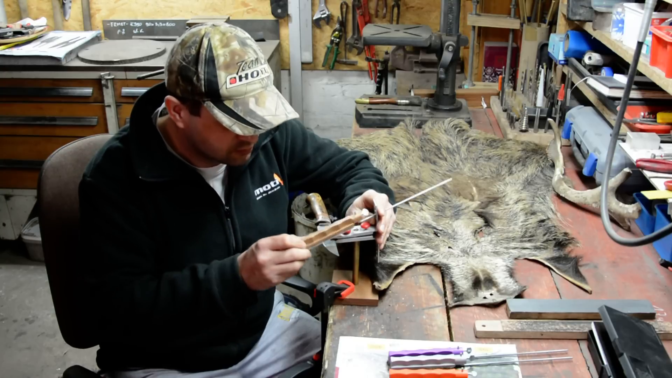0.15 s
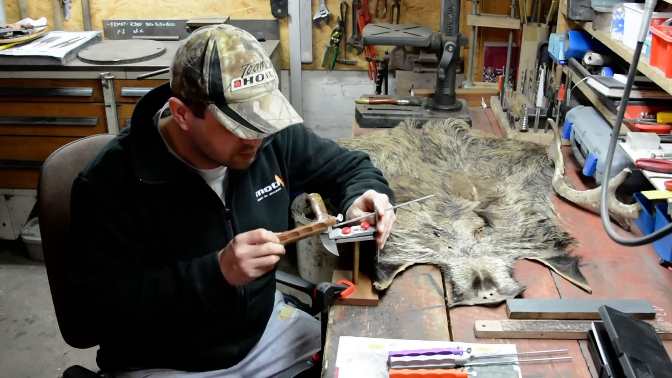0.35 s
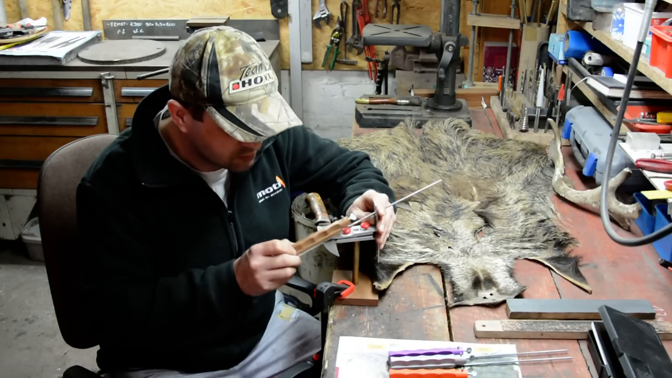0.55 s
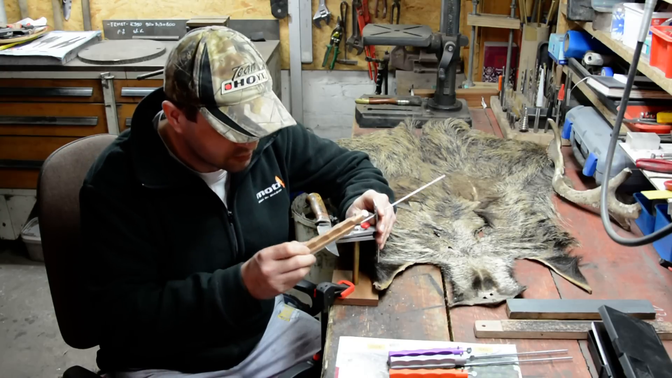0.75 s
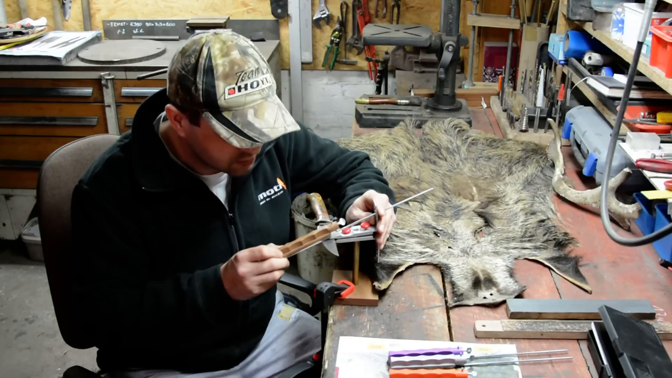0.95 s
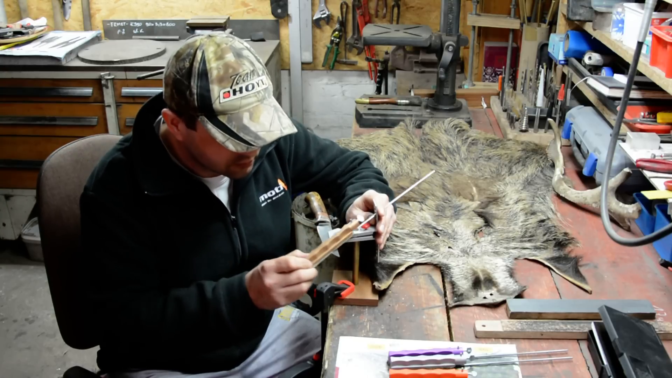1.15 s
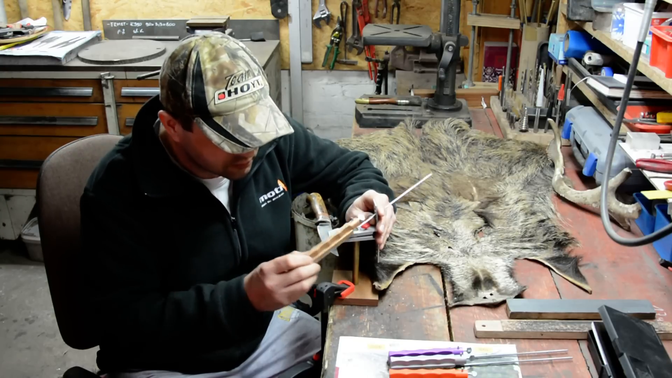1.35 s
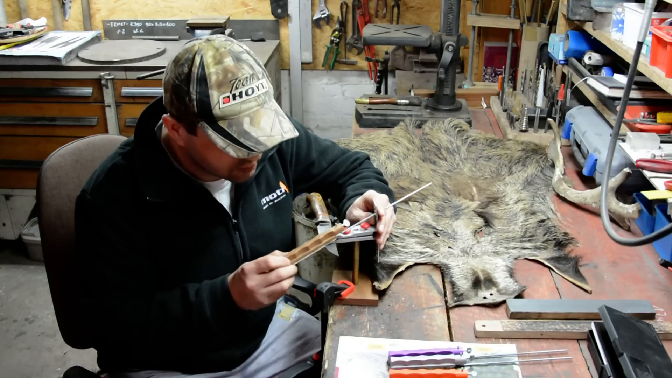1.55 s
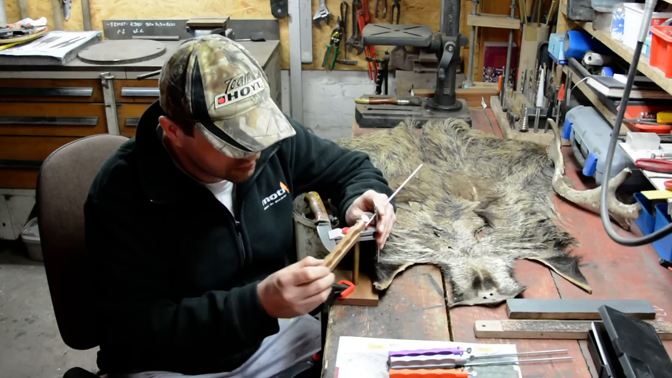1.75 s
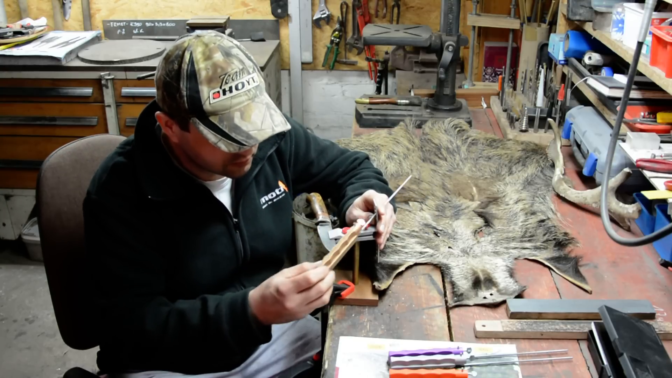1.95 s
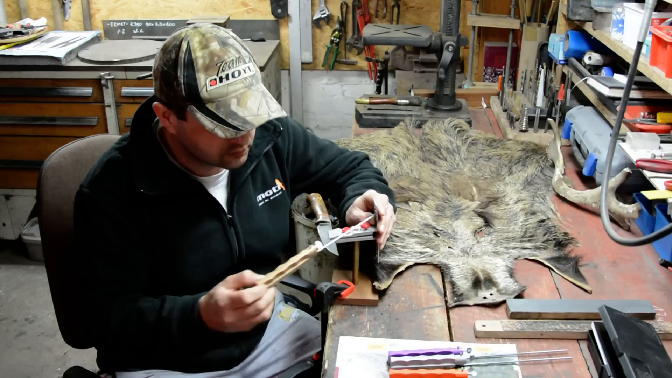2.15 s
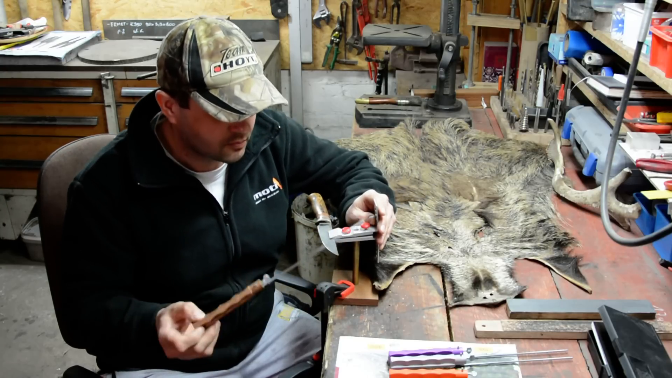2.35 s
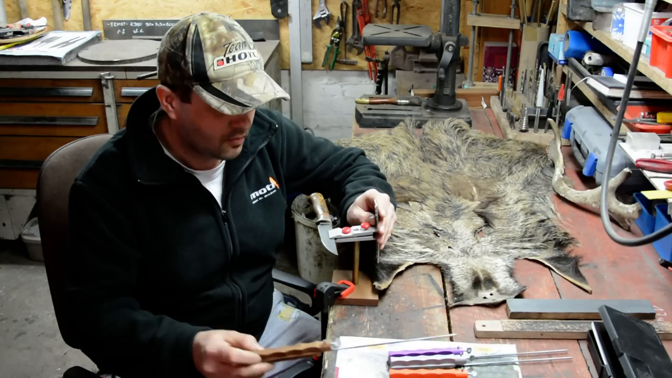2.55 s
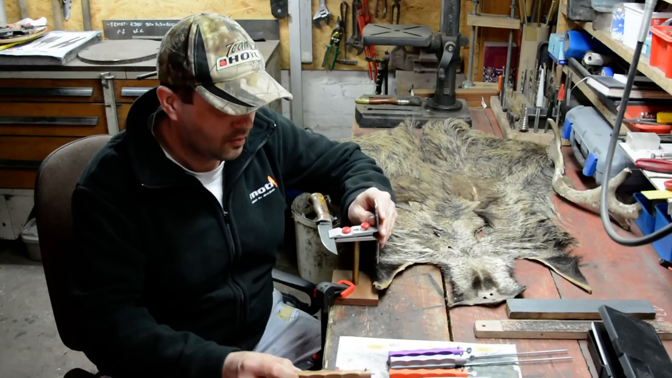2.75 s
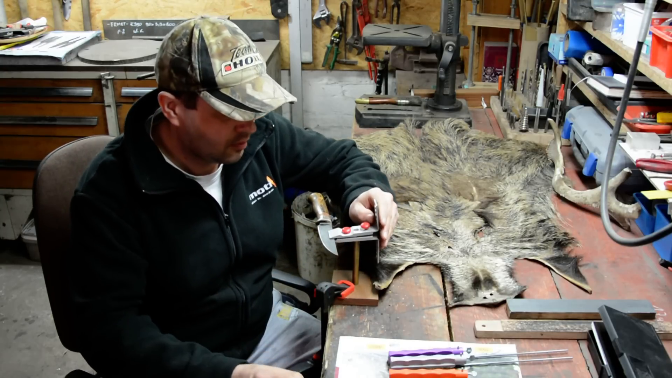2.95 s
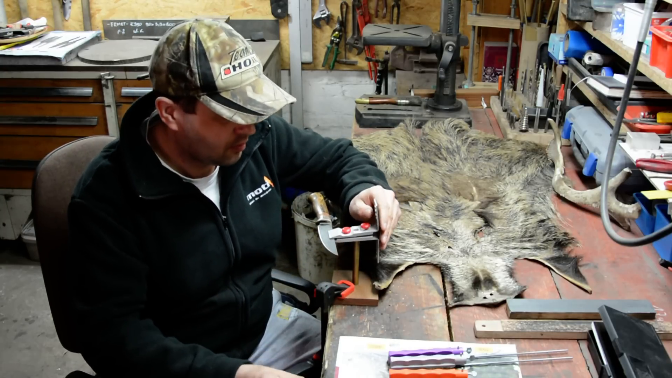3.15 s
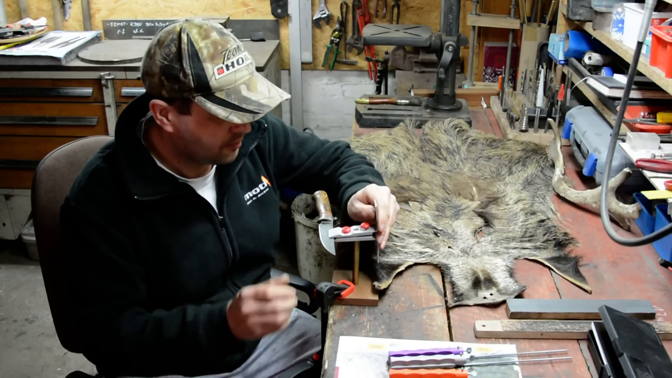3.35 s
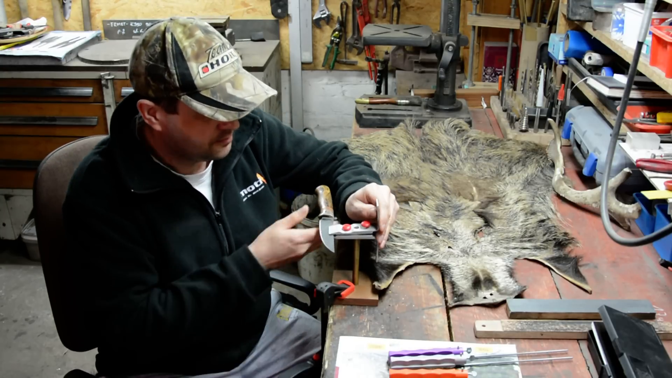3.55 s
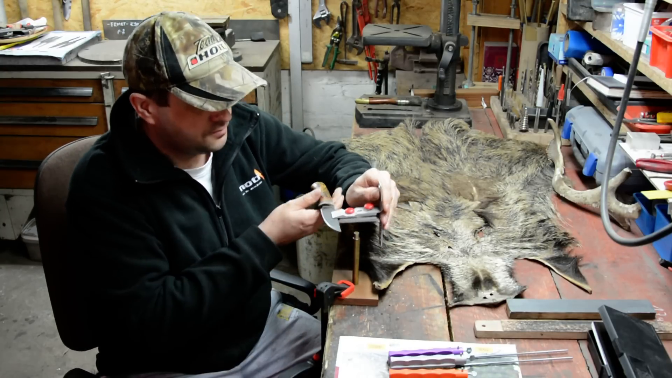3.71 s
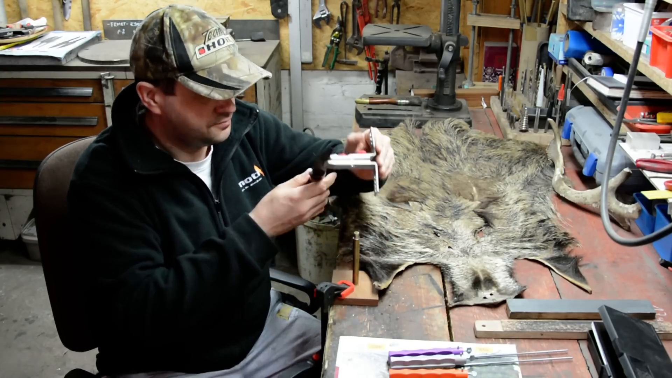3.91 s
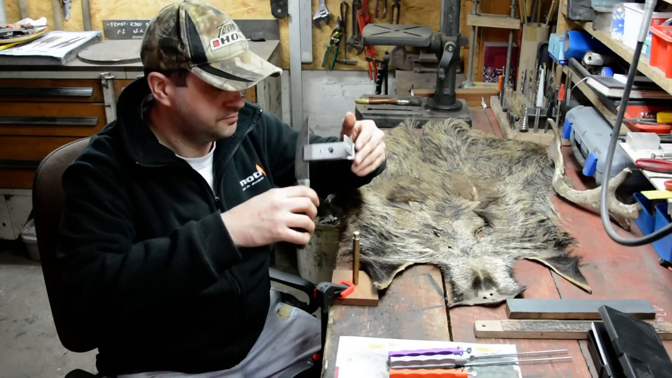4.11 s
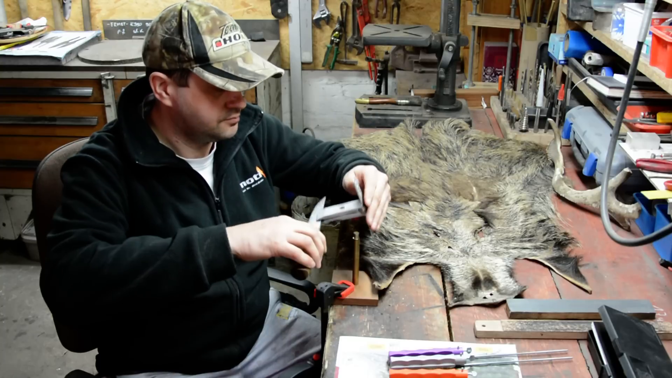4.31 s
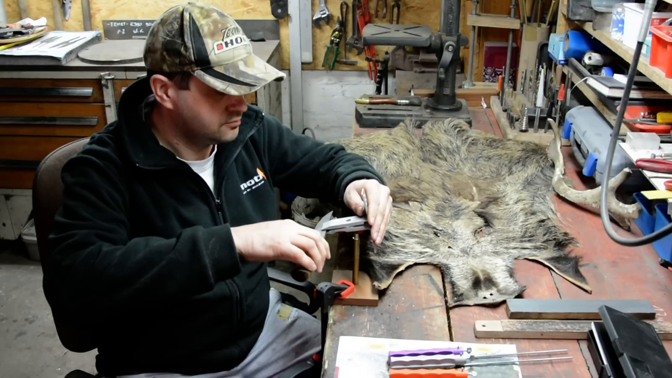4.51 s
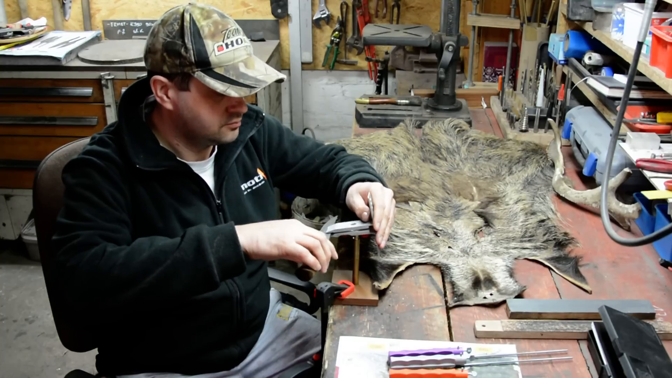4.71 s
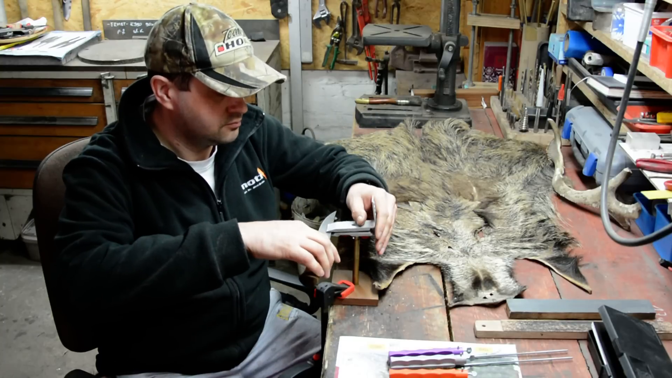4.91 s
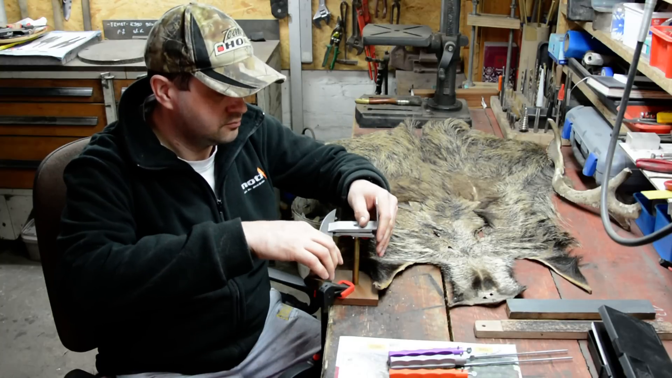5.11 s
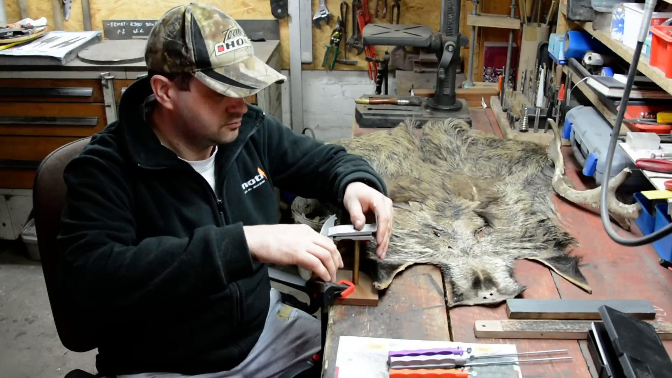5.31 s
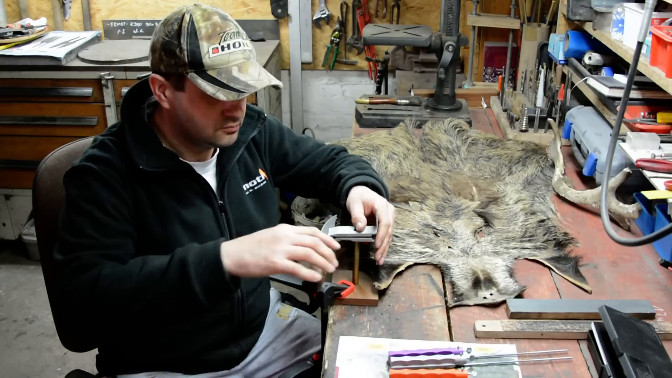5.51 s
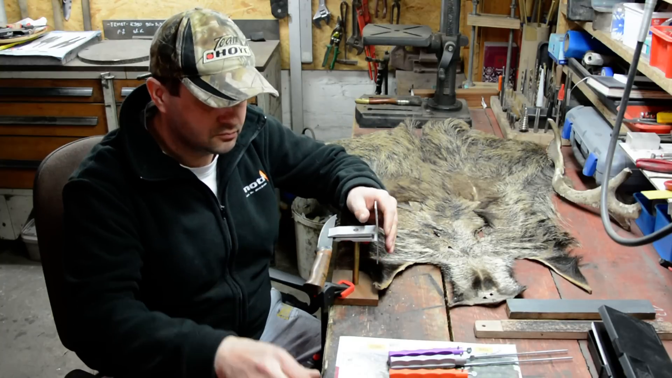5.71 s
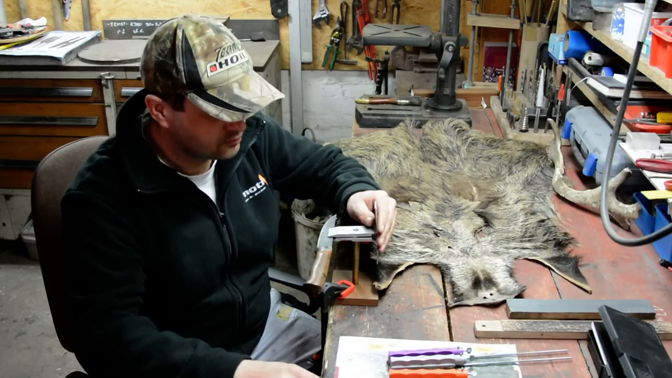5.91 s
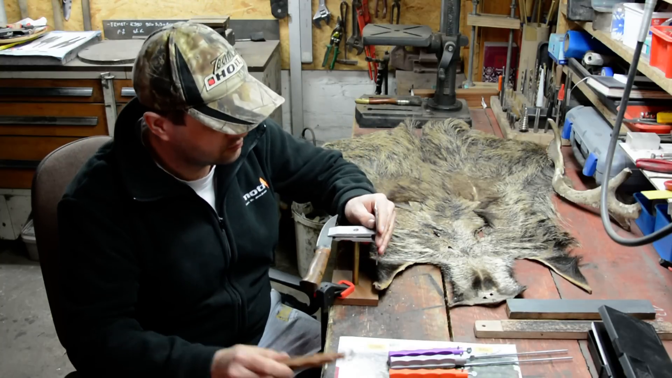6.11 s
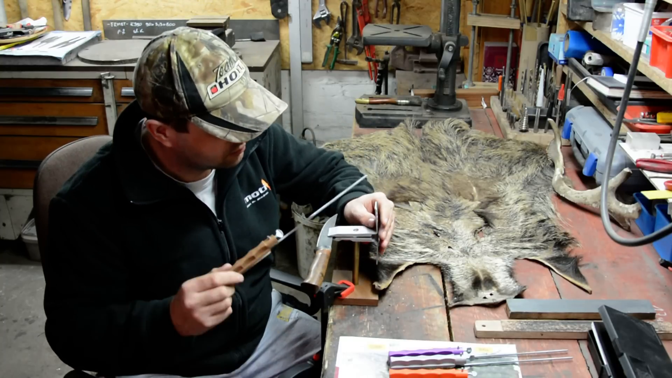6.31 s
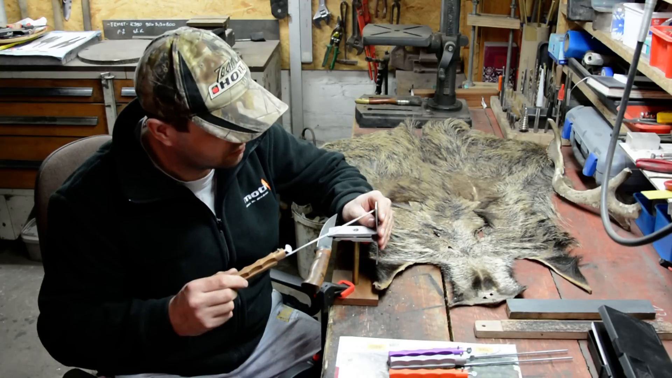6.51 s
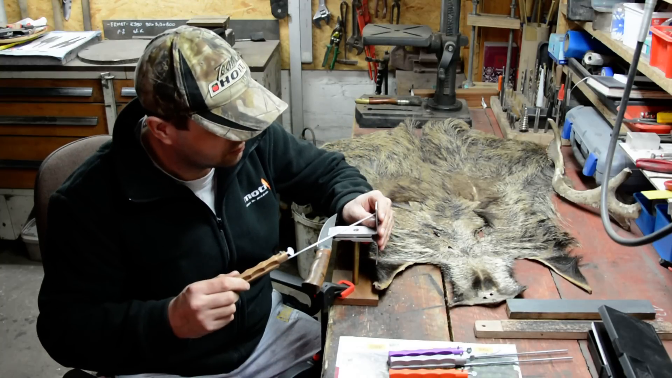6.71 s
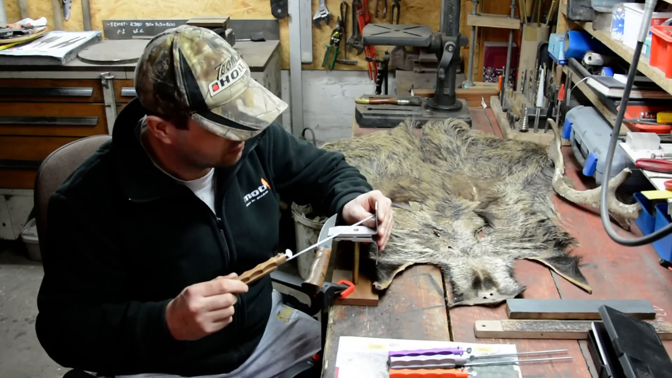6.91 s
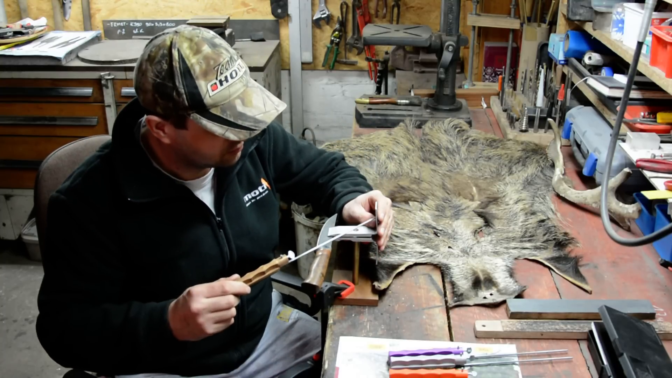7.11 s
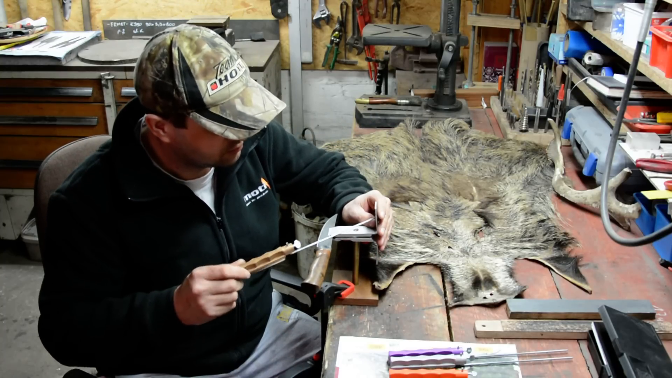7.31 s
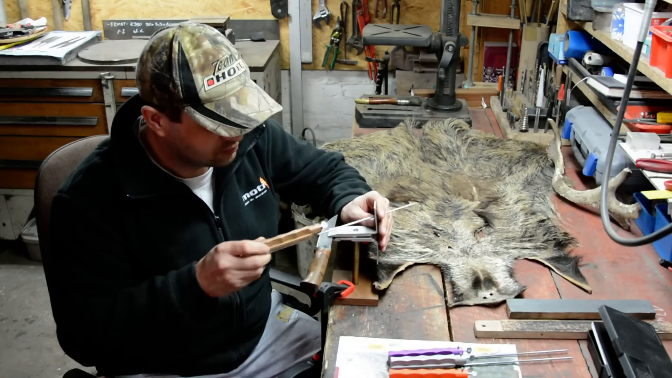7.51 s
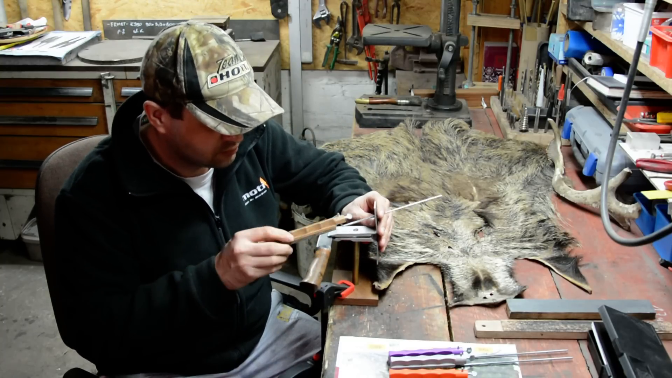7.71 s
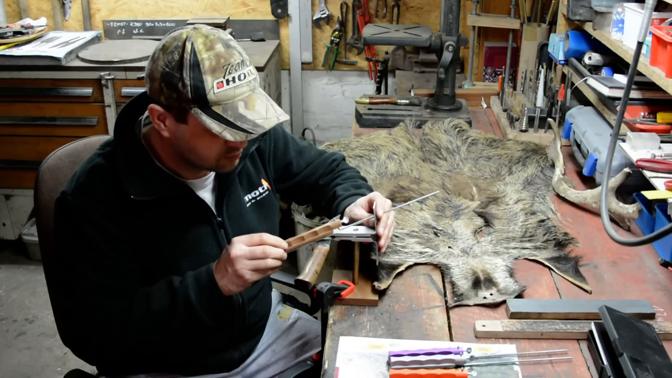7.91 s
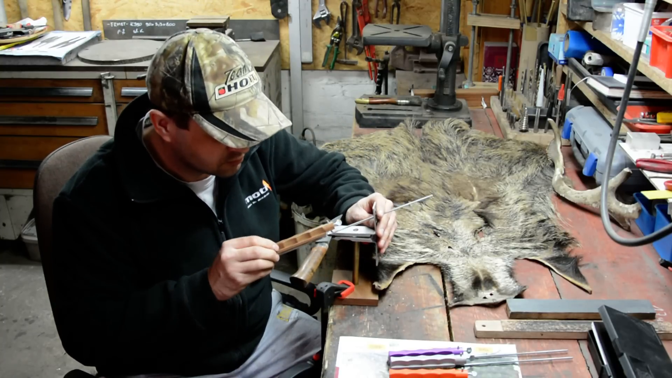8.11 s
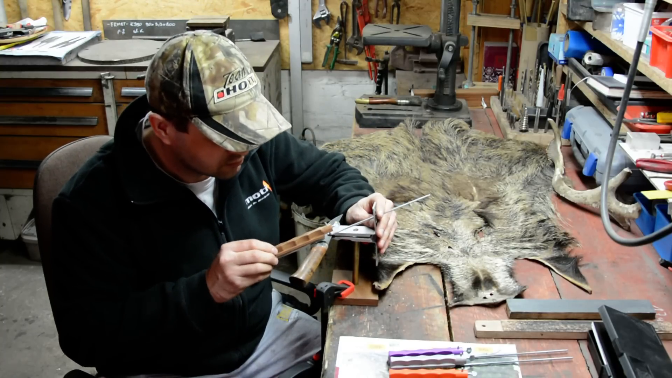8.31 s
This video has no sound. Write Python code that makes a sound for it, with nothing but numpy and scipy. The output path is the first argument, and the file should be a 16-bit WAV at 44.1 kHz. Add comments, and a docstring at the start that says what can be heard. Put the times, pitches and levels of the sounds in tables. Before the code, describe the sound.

Close, dry-ish sound in a small tool room with faint steady air and hum. Eight quick abrasive strokes alternate strong scrapes with duller, lighter returns, tapping the steel. A pause brings soft sleeve brushing, dull bumps and clamp chafing, ending in a very sharp, loud knock. After a quiet gap, metal clicks announce the rod's return, then a short rising squeak and one bright stroke.

```python
"""A sharpening stone on a guide rod is stroked along a clamped knife: grit drives the blade's modes and a hiss.
Taps excite blade modes through short chattering contacts; the rod rings as decaying sines when drawn out.
The stone is laid down and the clamp turned over and knocked home: blows on stand modes, plus friction noise.
A sleeve brushes, the rod clicks back, and the next stroke squeaks with a rising, unsteady tone.
Filtered noise and wavering hum give the air of a small workshop, whose reflections are decaying noise."""
import sys
import numpy as np
from scipy import signal
from scipy.fft import rfft, irfft
from scipy.io import wavfile
from scipy.ndimage import map_coordinates

SR = 44100
rng = np.random.default_rng(int(sys.argv[2]) if len(sys.argv) > 2 else 0)


def wrap_up_sound(samples):
    """Save the sound to the file named by the first command line argument, as 16-bit audio."""
    columns = np.atleast_2d(samples).T
    # keep every value between -1 and 1, then stretch to whole-number steps
    tamed = np.clip(columns, -1, 1)
    steps = np.round(tamed * 32767).astype(np.int16)
    wavfile.write(sys.argv[1], SR, steps)


N = 368235

# stone strokes along the edge, hard pushes and light returns:
# (start [s], hardest [s], end [s], body gain [dB], bright gain [dB], top gain before the sing/hiss mix [dB])
STONE_STROKES = [(-0.1, 0.112, 0.14, -46.5, -50, -45), (0.2, 0.368, 0.37, -49.5, -57.5, -77),
                 (0.399, 0.65, 0.72, -49, -54.5, -47.5), (0.737, 0.883, 0.95, -52, -57.5, -77),
                 (1.022, 1.267, 1.318, -51.5, -54, -45), (1.38, 1.485, 1.49, -55, -59.5, -79),
                 (1.581, 1.786, 1.825, -48.5, -55, -47.5), (1.983, 2.127, 2.25, -50.5, -47.5, -50.5),
                 (7.404, 7.55, 7.69, -45.5, -46, -65.5)]
# pressure shape of body, bright and top, one row each: (dip at the start [dB], dip at the end [dB])
PRESSURE_DIPS = [(5, 5.5), (10, 9), (15, 10)]
# broad rasp of stone on steel: (frequency [Hz], density [dB per Hz])
RASP_SPECTRUM = [(100, -14), (180, 1), (280, -11.5), (600, -9), (950, 9.5), (1300, 9.5), (1900, 1.5),
                 (2400, 3), (6000, -7.5), (10500, 3.5), (16000, -27)]
# bending modes that sing under the sliding stone, before the glide: (frequency [Hz], width [Hz], level [dB])
SINGING_MODES = [(1650, 150, -10), (2950, 300, -14), (4100, 200, -14), (5650, 170, -14), (6350, 130, -18),
                 (7200, 130, -18), (8150, 130, -17), (8800, 120, -8), (10480, 140, -1), (12250, 200, -11)]
# hiss of hard grinding: (frequency [Hz], density [dB per Hz])
GRIND_SPECTRUM = [(2000, -44), (5000, 7), (7500, 7), (10500, 0), (12500, -38), (15500, -26)]
# room noise: (frequency [Hz], density [dB per Hz])
AIR_SPECTRUM = [(15, -39), (25, -15), (56, -9), (96, -10), (194, -6.5), (268, -7), (307, -4.5), (460, -4.5),
                (671, -3), (727, -4.5), (978, -1), (1150, -3), (1770, -6.5), (4670, -16), (15700, -33)]
# hum tones, before trim and waver: (frequency [Hz], level [dB])
HUM_TONES = [(64.6, -84.5), (199.2, -68.5), (301.5, -66), (667.5, -67.5), (899.0, -84.5)]
# stone and rod tapping blade and guide, before trim: (time [s], body level [dB], low level [dB],
# bright level [dB], top level [dB], favoured ring [Hz], contact decay constant [ms])
BLADE_TAPS = [(0.099, -41, -43.5, -48, -44, 1320, 3.7), (0.345, -46, -62, -60, -63, 930, 6.8),
              (0.365, -43, -72, -59, -76, 890, 7.3), (0.413, -33.5, -79, -52, -52, 1430, 1.8),
              (0.492, -44.5, -54, -56, -60, 1780, 1.8), (0.671, -51, -54, -51, -53, 1530, 2.56),
              (0.968, -31.5, -49, -46.5, -57, 1328, 1.5), (1.175, -50, -67, -51.5, -71, 1610, 4.3),
              (1.557, -29.5, -48.5, -45, -44.5, 1017, 2.8), (2.208, -43, -70, -56, -74, 1590, 11.8),
              (2.741, -73, -64, -62, -64, 1500, 3.1), (6.501, -38.5, -44.5, -46, -45, 690, 4.4),
              (6.543, -43.5, -61, -62, -63, 660, 3.9), (6.662, -32, -46.5, -42, -36, 1640, 14),
              (6.874, -51, -63.5, -64.5, -82, 1650, 3.9), (6.978, -42.5, -60.5, -53.5, -45.5, 1670, 8.7),
              (7.028, -42, -57, -54.5, -50, 710, 17), (7.519, -38.5, -57.5, -43, -51, 1639, 10),
              (7.587, -41, -76, -45, -54, 1470, 8.9), (7.65, -36.5, -75, -44.5, -51, 1492, 8.3),
              (7.664, -35.5, -68, -72, -68, 930, 6.2)]
# resonances of the clamped blade with the stone on it, before random touch weighting:
# (frequency [Hz], width [Hz], level [dB])
BLADE_MODES = [(694, 12, 6), (915, 15, 9.5), (1061, 18, 11), (1290, 250, -6.5), (1576, 64, 0.5),
               (1850, 240, -4), (2770, 280, -2), (4140, 570, -5.5), (7020, 180, -4.5), (8700, 120, 1),
               (10250, 64, 5.5), (11800, 330, -29)]
# dense unresolved modes of the blade: (frequency [Hz], density [dB per Hz])
BLADE_DENSE = [(60, -20), (170, -11), (400, -4), (900, -2), (1750, 1.5), (2300, -6.5), (4000, 0),
               (7000, -10), (10500, 0), (13000, -21), (16000, -31)]
# guide rod set ringing: (time [s], level [dB], share of its free decay time [ratio])
ROD_RINGS = [(2.05, -66, 0.81), (2.19, -58, 0.72), (2.243, -55.5, 1), (6.976, -41, 0.32)]
# modes of the free guide rod: (frequency [Hz], level [dB], t60 [s])
ROD_MODES = [(5620, -7, .35), (7289, -4, .85), (9545, -2, .72), (12170, -6, .3)]
# dull knocks on bench, clamp and post, before trim: (time [s], body level [dB], low level [dB],
# bright level [dB], top level [dB], favoured ring [Hz], contact decay constant [ms])
STAND_KNOCKS = [(2.948, -47, -66, -64.5, -68, 1090, 6.8), (3.103, -31, -56, -45, -57, 1310, 2.1),
                (3.114, -29.5, -33.5, -72, -61, 384, 7), (3.403, -33.5, -49.5, -57, -68, 1150, 3.4),
                (3.595, -38, -74, -54, -78, 1330, 10), (3.621, -38.5, -77, -50.5, -86, 288, 6.5),
                (4.507, -15.5, -34.5, -51, -67, 915, 1.3), (4.567, -42, -44.5, -68, -80, 890, 0.96),
                (4.754, -20, -29.5, -52, -58.5, 880, 4.7), (4.811, -45, -44, -75, -82, 845, 2.4),
                (5.155, -29.5, -49, -41, -54, 1480, 8.5), (5.169, -24.5, -24.5, -42.5, -64, 690, 3.8),
                (5.277, -30.5, -37.5, -56.5, -81, 1420, 3.2), (5.383, -5.5, -19.5, -19, -24, 1710, 1.3)]
# resonances of post, stand and bench, before random touch weighting: (frequency [Hz], width [Hz], level [dB])
STAND_MODES = [(193.2, 13, -2.5), (298, 28, -3.5), (375, 14, 2), (433, 25.5, 4), (621.4, 25, 1),
               (692.6, 16, 5.5), (837, 12, -2), (906.2, 12, 9.5), (1075.5, 18, 5), (1298, 55, -7),
               (1447, 35, -7.5), (1550, 71, -2.5), (1829, 60, -5.5), (3050, 160, -11.5), (3666, 90, -21.5),
               (5200, 660, -19), (8770, 210, -21.5), (10400, 600, -30.5)]
# dense unresolved modes of the stand: (frequency [Hz], density [dB per Hz])
STAND_DENSE = [(40, -13), (120, -23), (300, -1), (700, -1.5), (1200, 2.5), (1800, -10.5), (2300, -14.5),
               (4000, -15.5), (5500, -23), (7500, -26), (10500, -22.5), (12500, -48), (16000, -58.5)]
# sleeve brushing along the bench: (peak time [s], level [dB], swell time [s], fade time [s])
SLEEVE_BRUSHES = [(3.09, -52.5, 0.035, 0.07), (5.95, -51, 0.063, 0.061)]
# brushing cloth: (frequency [Hz], density [dB per Hz])
CLOTH_SPECTRUM = [(300, -33), (2000, -5.5), (4000, 1), (8000, 2), (11000, -1), (13000, -13), (16000, -31.5)]
# the clamp chafing in the hand and on its post:
# (peak time [s], level [dB], swell time [s], fade time [s], rumble level before halving [dB])
CLAMP_CHAFES = [(3.402, -35.5, 0.0057, 0.004, 2.5), (3.606, -38.5, 0.019, 0.023, -10),
                (3.66, -57.5, 0.037, 0.035, 11.5), (4.67, -46, 0.013, 0.047, 9),
                (4.924, -40.5, 0.009, 0.033, 5.5), (5.157, -29.5, 0.012, 0.0072, -3),
                (5.275, -34.5, 0.0087, .004, 0), (5.384, -15, 0.0033, 0.0066, -7.5),
                (5.597, -43.5, 0.028, 0.035, 2.5)]
# rasp of the clamp being handled: (frequency [Hz], gain on top of the stand's dense modes [dB])
SCRAPE_TONE = [(400, -21), (900, 12), (1300, 3.5), (3300, 0.5), (4500, -7), (12000, -5)]
# dull part of that chafing: (frequency [Hz], gain on top of the stand's dense modes [dB])
RUMBLE_TONE = [(100, -15.5), (200, -2.5), (300, -2), (450, -13), (1500, -42.5)]
# squeaks as the stone is pushed forward, before waver:
# (peak time [s], level [dB], swell time [s], fade time [s], pitch at the peak [Hz])
STONE_SQUEAKS = [(7.383, -38, 0.012, 0.009, 1534), (7.501, -39, 0.064, 0.06, 1660)]
# workshop decay: (frequency [Hz], t60 [s])
ROOM_DECAY = [(120, .33), (400, .23), (1000, .19), (3000, .18), (8000, .16), (15000, .12)]
# stereo width: (frequency [Hz], side gain of stand [dB], of blade [dB], of room noise [dB])
STEREO_WIDTH = [(60, -25, -17, -13), (150, -24, -14, -8.5), (500, -29, -12, -3.5), (1200, -25, -13, -3),
                (2200, -17, -10, -2), (4500, -16, -9, -1), (9000, -10, -9, -1), (15000, -9, -6, 0)]
# low, body, bright and top bands, one row each: (lower edge [Hz], upper edge [Hz])
BAND_LIMITS = [(125, 600), (600, 2200), (2200, 7000), (7000, 17000)]

TIME = np.arange(N) / SR
RING = TIME[:int(.4 * SR)]  # time axis of one ring or response
BAND_FILTERS = [signal.butter(4, edges, "band", fs=SR, output="sos") for edges in BAND_LIMITS]
LAND_S, LIFT_S = 0.014, 0.014  # time constants for the stone to take hold and to let go
GLIDE = 0.05  # share by which the blade's ringing rises along a stroke
BITE_DB = -44  # top gain at which singing gives way to grinding
AIR_DB = -55.5  # middle level of the room noise, before its slow wander
SQUEAK_RISE_PER_S = 0.68  # relative rise in pitch as the stone advances
TOP_HZ = 15900  # upper limit of the finished sound


def undb(db):
    """Decibels to gain."""
    return np.exp(np.asarray(db) * np.log(10) / 20)


def unit(x):
    """Scale to rms 1."""
    return x / np.sqrt(np.mean(x ** 2))


def energy_one(x):
    """Scale a response to energy 1."""
    return x / np.sqrt(np.sum(x ** 2))


def fade(t60):
    """Exponential decay, 60 dB down after t60 seconds."""
    return np.exp(-np.log(1000) * RING / max(t60, 1e-4))


def swell(s, rise, fall):
    """Gain that grows exponentially to 1 at time s and dies away again."""
    time_constant = np.where(TIME < s, rise, fall)
    return np.exp(-np.minimum(np.abs(TIME - s) / time_constant, 20))


def walk(rate):
    """Smooth random wander with a spread near 1, taking `rate` new values per second."""
    knots = rng.standard_normal(N // 16)
    return np.interp(TIME * rate, np.arange(len(knots)), knots)


def colour(x, points):
    """Minimum-phase filter through (Hz, dB) points: causal, so attacks stay sharp."""
    size = 8192
    hz, db = np.transpose(points)
    log_hz = np.log(np.fft.rfftfreq(size, 1 / SR) + 1)
    gain = undb(np.interp(log_hz, np.log(hz), db))
    cepstrum = irfft(np.log(gain))
    # folding the cepstrum forward in time makes the phase minimal
    cepstrum[1:size // 2] *= 2
    cepstrum[size // 2 + 1:] = 0
    response = irfft(np.exp(rfft(cepstrum)))[:size // 2]
    return signal.oaconvolve(x, response)[:len(x)]


def bands(x):
    """Split into low, body, bright and top."""
    return [signal.sosfilt(sos, x) for sos in BAND_FILTERS]


def through(x, response):
    """Drive a response with x."""
    return signal.oaconvolve(x, response)[:len(x)]


def add(out, s, x):
    """Mix x in at time s."""
    i = max(int(s * SR), 0)
    out[i:i + len(x)] += x[:N - i]


def workshop(wet_db, build_s=0.0037):
    """Direct sound, then dense reflections from bench, shelves and walls; the lows stay longest."""
    noise = rfft(rng.standard_normal(len(RING)))
    log_hz = np.log(np.fft.rfftfreq(len(RING), 1 / SR) + 1)
    centres, t60s = np.transpose(ROOM_DECAY)
    tail = np.zeros(len(RING))
    # overlapping frequency shares, each with its own decay
    for row, t60 in zip(np.eye(len(centres)), t60s):
        share = np.interp(log_hz, np.log(centres), row)
        tail += irfft(noise * share, len(RING)) * fade(t60)
    build_up = 1 - np.exp(-RING / build_s)
    response = undb(wet_db) * energy_one(tail * build_up)
    response[0] += 1
    return response


def body(modes, crack, crack_db, crack_t60):
    """Response of an object: modes randomly weighted for the spot touched, and a short dense crack."""
    hz, width, db = np.transpose(modes)[:, :, None]
    touch_db = 2 * rng.standard_normal(hz.shape)
    polarity = rng.choice([-1, 1], hz.shape)
    weight = width * undb(db + touch_db) * polarity
    decay = np.exp(-np.pi * width * RING)  # wider resonances die sooner
    ring = np.sum(weight * decay * np.sin(2 * np.pi * hz * RING), axis=0)
    dense = colour(rng.standard_normal(len(RING)) * fade(crack_t60), crack)
    return energy_one(ring) + undb(crack_db) * energy_one(dense)


def blow(response, band_db, ring_hz, contact_ms, chatter_db, focus_db):
    """A contact that chatters more the longer it lasts; the spot that is struck favours one ring."""
    chatter = rng.standard_normal(len(RING)) * fade(np.log(1000) * contact_ms / 1e3)
    force = undb(chatter_db) * contact_ms * energy_one(chatter)
    force[0] += 1
    focus = [(ring_hz / 1.25, 0), (ring_hz, focus_db), (ring_hz * 1.25, 0)]
    sound = bands(colour(through(force, response), focus))
    out = np.zeros(len(RING))
    for band, db in zip(sound, band_db):
        attack_rms = np.sqrt(np.mean(band[:SR // 32] ** 2))  # levels refer to the first 1/32 s
        out += undb(db) * band / attack_rms
    return out


def grit(judder_db, judder_hz):
    """Countless grains catching and letting go, in uneven flurries."""
    grain_db = 4 * np.minimum(rng.exponential(size=N), 5)
    grains = rng.standard_normal(N) * undb(grain_db)
    return unit(grains * undb(judder_db * walk(judder_hz)))


def hand():
    """Band gains and travel (-.5 to .5) of the stone: each stroke lands, bears down, eases and lifts."""
    gains, travel = np.zeros((len(PRESSURE_DIPS), N)), np.zeros(N)
    for start, hardest, end, *levels in STONE_STROKES:
        near = (TIME > start) & (TIME < end + 10 * LIFT_S)
        t = TIME[near]
        landing = 1 - np.exp((start - t) / LAND_S)
        lifting = np.exp(-np.maximum(t - end, 0) / LIFT_S)
        for gain, db, (swell_db, ease_db) in zip(gains, levels, PRESSURE_DIPS):
            dip_db = np.interp(t, [start, hardest, end], [swell_db, 0, ease_db])
            gain[near] += landing * lifting * undb(db - dip_db)
        travel[near] = np.interp(t, [start, end], [-.5, .5])
    return gains, travel


def strokes(low_db=-9, hiss_db=-1, echo_ms=0.82, echo_shift=0.35):
    """Grit drives the blade. Light contact makes it sing; harder contact adds a broad hiss."""
    (press, rasp, bite), travel = hand()
    force = grit(judder_db=5.5, judder_hz=131.5)
    ringing = .6 * unit(colour(force, RASP_SPECTRUM))
    # the travelling stone favours now this mode, now that
    for hz, width, db in SINGING_MODES:
        mode = signal.lfilter(*signal.iirpeak(hz, hz / width, fs=SR), force)
        ringing = ringing + undb(db) * unit(mode * undb(4.5 * walk(16)))
    # it also bends their pitch as it loads the blade: resample at a drifting, gliding speed
    bend = np.cumsum(.01 * walk(12) + GLIDE * travel)
    ringing = map_coordinates(ringing, [np.arange(N) + bend], order=3, mode="mirror")
    hiss = colour(grit(judder_db=3.5, judder_hz=198), GRIND_SPECTRUM)
    # vibration returns from the end of the stone sooner and sooner, sweeping ripples through the hiss
    back = TIME - echo_ms / 1000 * (1 - echo_shift * travel)
    hiss = hiss + .6 * np.interp(back, TIME, hiss)
    room = workshop(wet_db=-3)
    low, middle, bright, sing = map(unit, bands(through(ringing, room)))
    hiss = unit(through(hiss, room))
    sing_share = 1 / (1 + (bite / undb(BITE_DB)) ** 2)  # power share, falling as the stone bites
    top = np.sqrt(sing_share) * sing + undb(hiss_db) * np.sqrt(1 - sing_share) * hiss
    return press * (undb(low_db) * low + middle) + rasp * bright + bite * top


def air(hum_db=-3):
    """Steady room noise, unrelated left and right except in the bass, with a faint wavering hum."""
    mid = unit(colour(rng.standard_normal(N), AIR_SPECTRUM))
    side = unit(colour(rng.standard_normal(N), AIR_SPECTRUM))
    side = colour(side, np.array(STEREO_WIDTH)[:, [0, 3]])
    hum = np.zeros(N)
    for hz, db in HUM_TONES:
        level = undb(db + hum_db + 2 * walk(1.2))
        hum += level * np.sin(2 * np.pi * hz * TIME + walk(4.8))
    return undb(AIR_DB + 0.44 * walk(3.3)) * np.array([mid + side, mid - side]) + hum


def taps(body_db=-4):
    """Stone and rod land on the blade and in the guide slot, exciting the blade's modes."""
    out = np.zeros(N)
    for s, middle, low, bright, top, ring_hz, contact_ms in BLADE_TAPS:
        blade = body(BLADE_MODES, BLADE_DENSE, crack_db=-1.5, crack_t60=0.031)
        blade = through(blade, workshop(wet_db=-4.5))
        levels = (low, middle + body_db, bright, top)
        tap = blow(blade, levels, ring_hz, contact_ms, chatter_db=-8, focus_db=11.5)
        add(out, s - .001, tap)  # begins 1 ms early
    return out


def rod():
    """The thin steel rod rings on when it slips free, and only briefly inside its guide."""
    out = np.zeros(N)
    for s, level_db, freedom in ROD_RINGS:
        ring = np.zeros(len(RING))
        for hz, db, t60 in ROD_MODES:
            tone = np.sin(2 * np.pi * (hz * RING + rng.random()))
            ring += undb(db) * fade(t60 * freedom) * tone
        add(out, s, undb(level_db) * ring)
    return out


def knocks(low_db=-2, body_db=-3):
    """The stone is laid down; the clamp bumps on its post and finally drops home, ringing the stand."""
    out = np.zeros(N)
    for s, middle, low, bright, top, ring_hz, contact_ms in STAND_KNOCKS:
        stand = body(STAND_MODES, STAND_DENSE, crack_db=1, crack_t60=.05)
        stand = through(stand, workshop(wet_db=-4))
        levels = (low + low_db, middle + body_db, bright, top)
        knock = blow(stand, levels, ring_hz, contact_ms, chatter_db=-20, focus_db=4)
        add(out, s - .001, knock)  # begins 1 ms early
    return out


def sleeve():
    """Fleece brushes over the bench as the stone is put down and picked up: soft juddering noise."""
    touch = sum(undb(db) * swell(s, rise, fall) for s, db, rise, fall in SLEEVE_BRUSHES)
    return touch * unit(colour(grit(judder_db=3.0, judder_hz=88.5), CLOTH_SPECTRUM))


def chafes():
    """Friction swells as the clamp slides, and dies when it catches."""
    rub = colour(grit(judder_db=1.5, judder_hz=144.3), STAND_DENSE)
    scrape = unit(colour(rub, SCRAPE_TONE))
    rumble = unit(colour(rub, RUMBLE_TONE))
    out = np.zeros(N)
    for s, db, rise, fall, rumble_db in CLAMP_CHAFES:
        friction = scrape + undb(rumble_db) * rumble / 2
        out += undb(db) * swell(s, rise, fall) * friction
    return out


def squeak(wobble=0.0393):
    """Unsteady stick-slip that rises as the stone advances."""
    out = np.zeros(N)
    unsteady = 1 + wobble * walk(500)
    for s, db, rise, fall, hz in STONE_SQUEAKS:
        advance = 1 + SQUEAK_RISE_PER_S * np.clip(TIME - s, -.5, .5)
        phase = 2 * np.pi * np.cumsum(hz * advance * unsteady) / SR
        out += undb(db) * swell(s, rise, fall) * np.sin(phase)
    flutter = undb(2.7 * walk(152.4))
    return through(out * flutter, workshop(wet_db=-12))


def ports(mid, axis, diffuse_db):
    """A phase-shifted side signal widens the sound; a short random tail adds diffuse width."""
    freqs = np.fft.rfftfreq(N, 1 / SR)
    table = np.array(STEREO_WIDTH)
    width = undb(np.interp(freqs, table[:, 0], table[:, axis]))
    lead = np.sin(2 * np.pi * freqs / 700)  # the channel that leads in phase alternates along the spectrum
    diffuse = through(mid, energy_one(rng.standard_normal(len(RING)) * fade(.12)))
    side = irfft((1j * rfft(mid) * lead + undb(diffuse_db) * rfft(diffuse)) * width, N)
    return np.array([mid + side, mid - side])


def scene():
    """Stand and blade sound near the middle, inside the wide room noise."""
    blade = strokes() + taps() + rod() + sleeve() + squeak()
    stand = knocks() + chafes()
    return air() + ports(stand, axis=1, diffuse_db=-11.5) + ports(blade, axis=2, diffuse_db=-23)


def record(dry):
    """Peaks beyond full scale clip; a steep low-pass cuts the top."""
    low_pass = signal.ellip(8, .2, 70, TOP_HZ, fs=SR, output="sos")
    return signal.sosfilt(low_pass, np.clip(dry, -1, 1))


dry = scene()
out = record(dry)
wrap_up_sound(out)
```